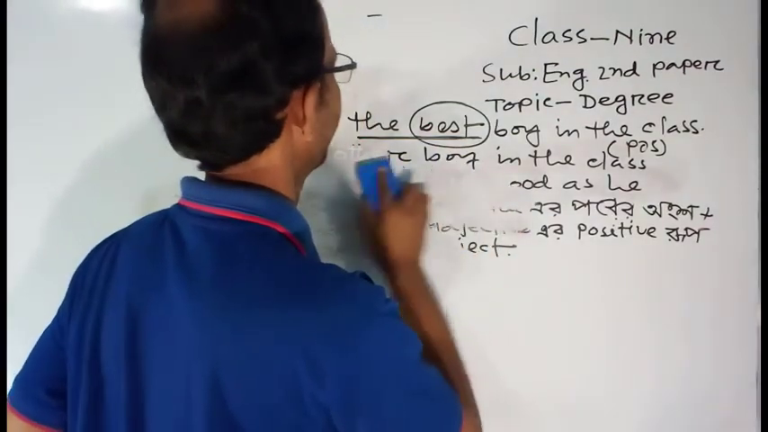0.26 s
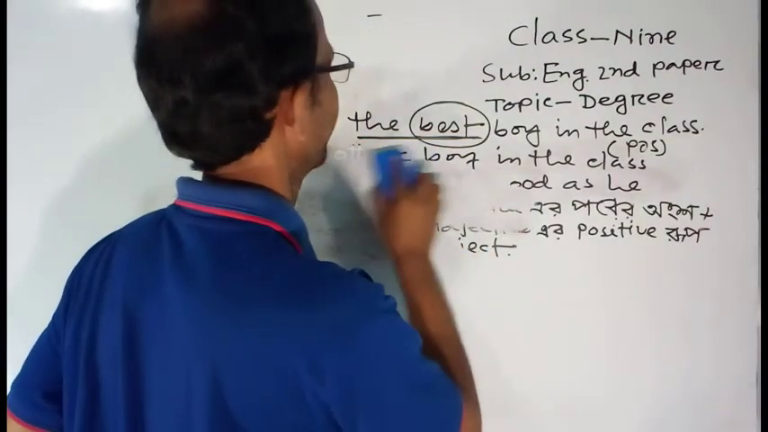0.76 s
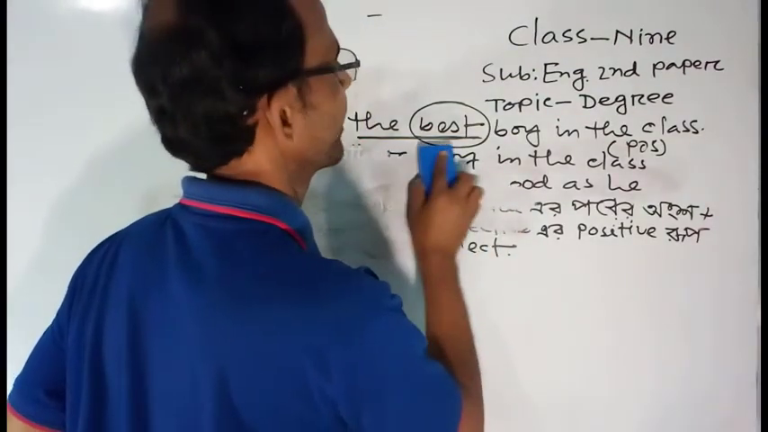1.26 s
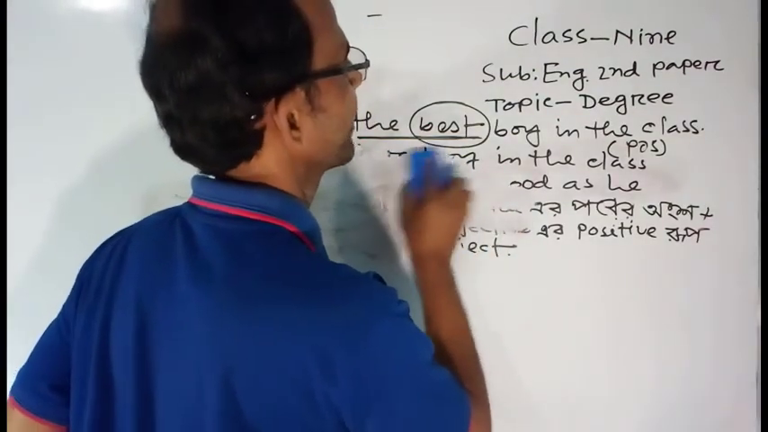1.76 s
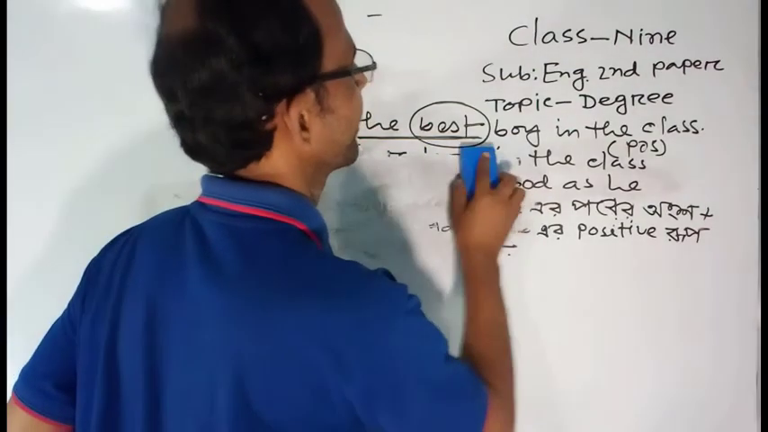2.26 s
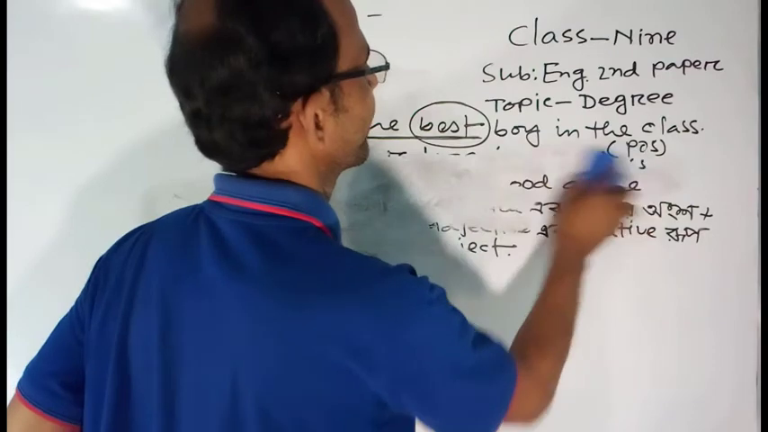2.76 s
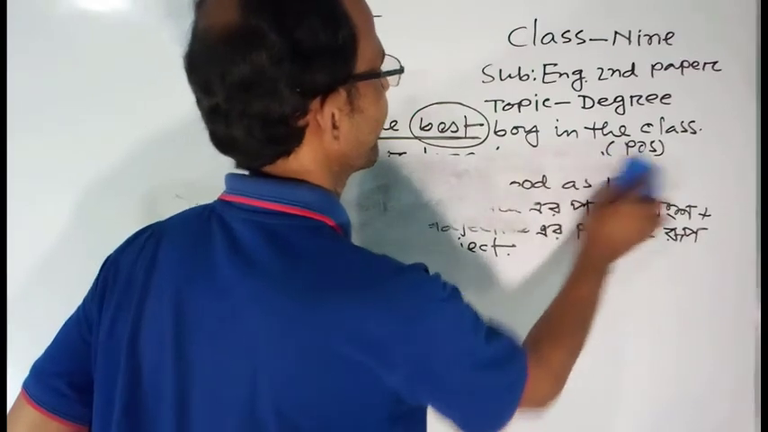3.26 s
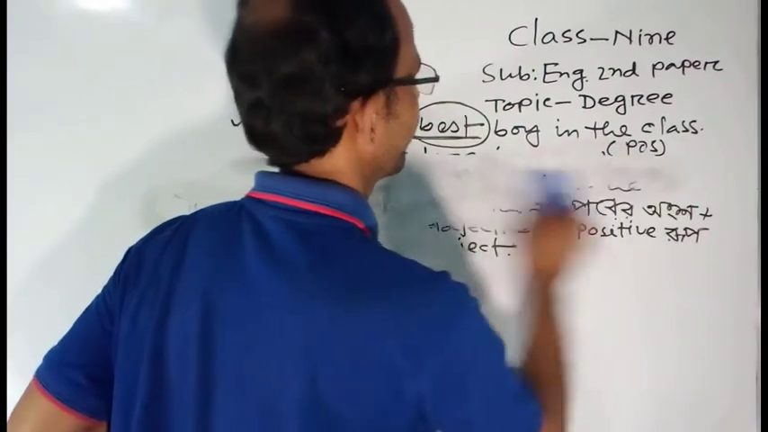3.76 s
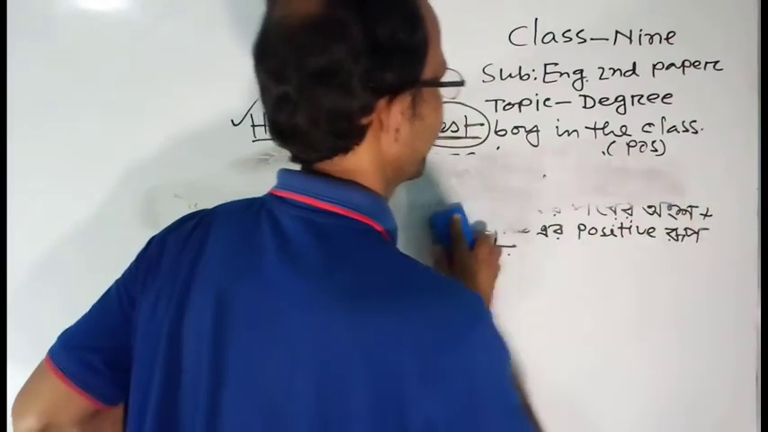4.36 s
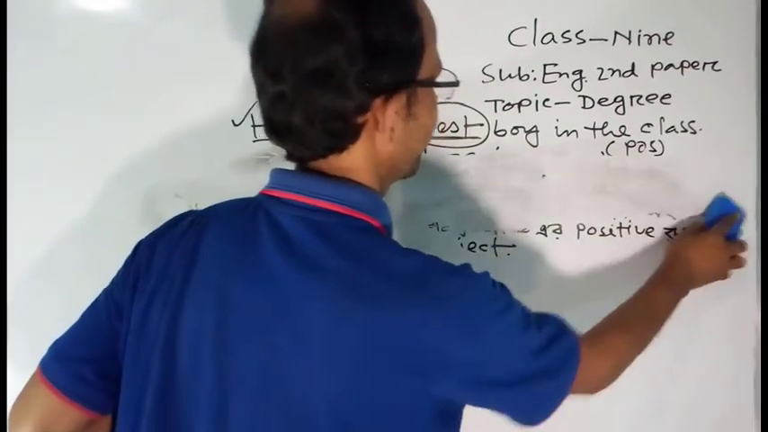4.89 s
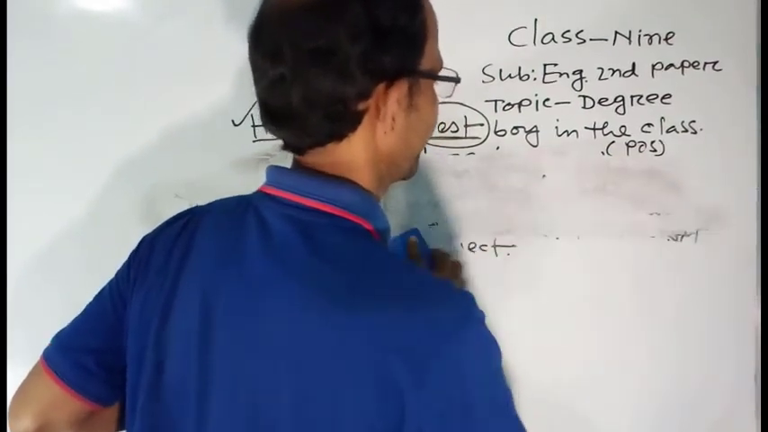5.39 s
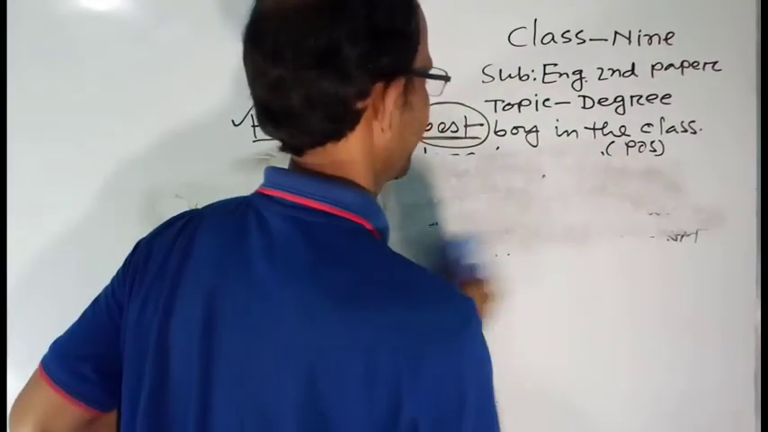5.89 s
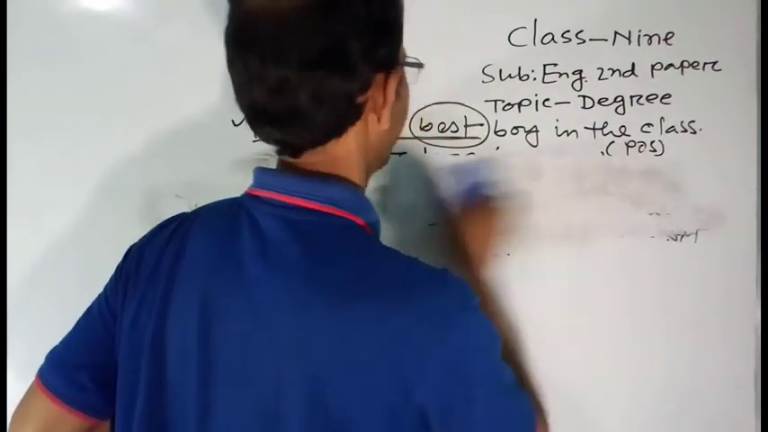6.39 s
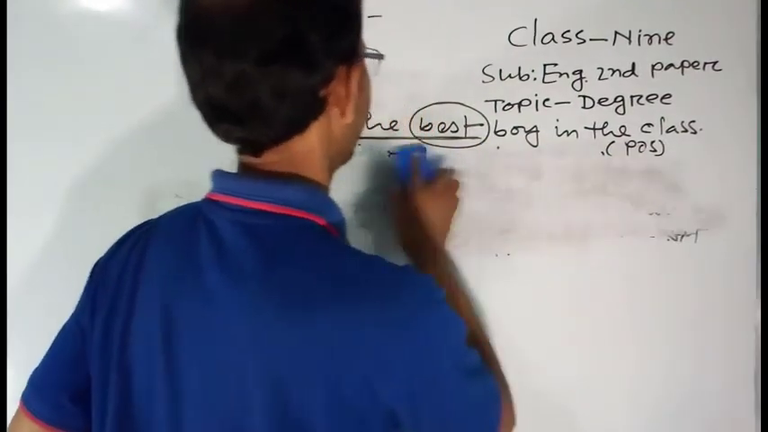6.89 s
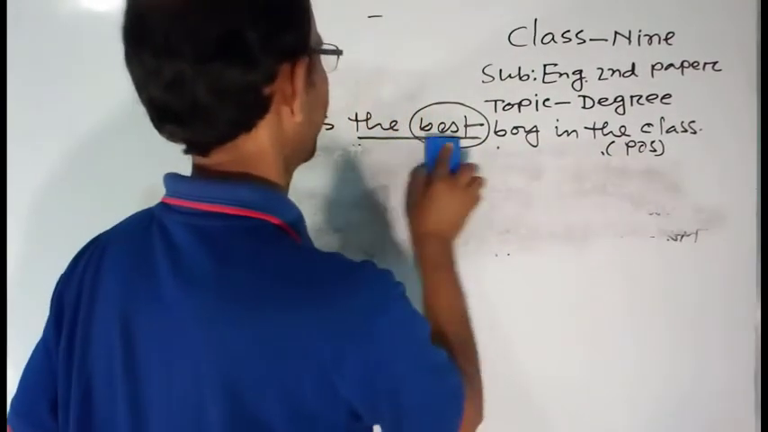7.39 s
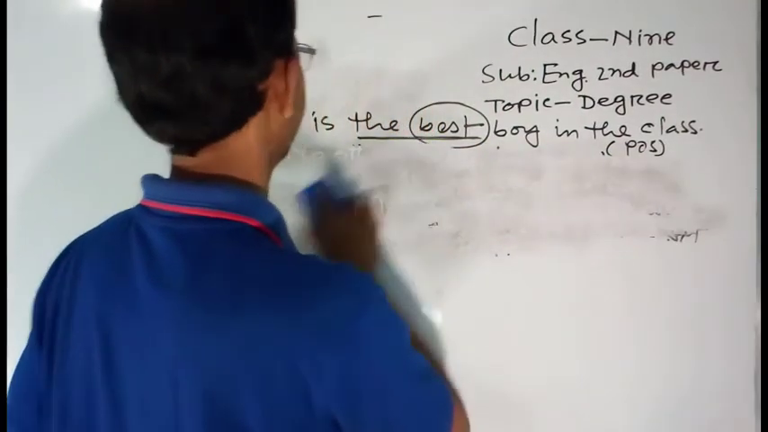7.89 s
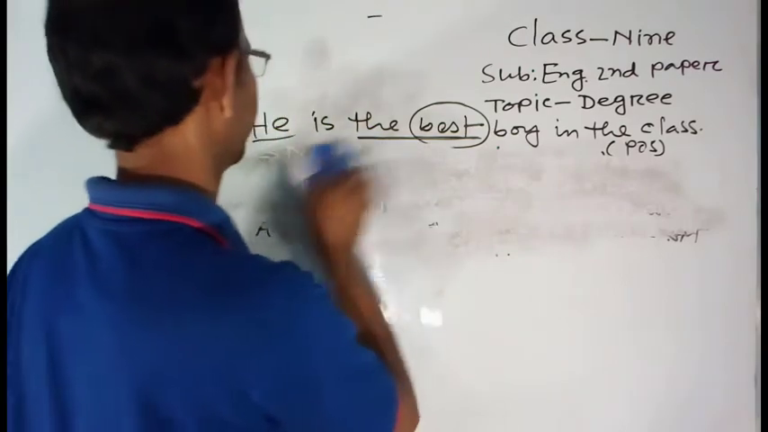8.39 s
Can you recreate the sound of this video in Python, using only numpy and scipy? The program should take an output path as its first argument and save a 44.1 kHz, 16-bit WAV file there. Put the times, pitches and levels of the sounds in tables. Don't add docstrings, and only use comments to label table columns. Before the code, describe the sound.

Brisk, raspy swishes of felt rubbing a smooth board, short then longer then short again, with occasional knocks and faint squeaky tones.

```python
import sys
import numpy as np
from scipy import signal
from scipy.fft import rfft, irfft, next_fast_len
from scipy.io import wavfile
from scipy.ndimage import map_coordinates

SR = 44100
rng = np.random.default_rng(int(sys.argv[2]) if len(sys.argv) > 2 else 0)


def convert_level_to_amplitude(level_db):
    exponent = np.asarray(level_db, float) / 20
    return 10 ** exponent


def store_pcm(level_fs):
    pcm = np.round(np.clip(level_fs, -1, 1) * 32767).astype(np.int16)
    wavfile.write(sys.argv[1], SR, np.atleast_2d(pcm).T)


N = 381465

# [f/Hz, density/dB per Hz]
FAN_HISS = [(30, -104), (48, -76.5), (150, -78.5), (350, -85.5), (900, -92.5), (2000, -93), (4000, -91.5),
            (5900, -96), (6500, -82), (7000, -81), (7500, -101), (10500, -100), (12500, -113),
            (16000, -117)]
# [f/Hz, width/Hz, density/dB per Hz]
FAN_WHINE = [(636, 29, -85), (673, 5.3, -103), (2526, 162, -81)]

# [f/Hz, density/dB per Hz]
THUD_SPECTRUM = [(28, -28), (45, -3), (65, -8), (110, -6), (180, -8.5), (260, -20)]
# [f/Hz, width/Hz, level/dB]
GROAN_MODES = [(300, 8, 12), (376, 18.5, 4), (186, 31, -32)]
# [t/s, level/dB, hold/s]
THUD_PUSHES = [(.11, -49, 0.033), (.23, -51.5, 0.0076), (.87, -54, 0.012), (1.6, -49.5, 0.011),
               (1.92, -46.5, 0.04), (2.19, -48.5, 0.013), (2.53, -47.5, 0.027), (2.93, -48.5, 0.012),
               (3.01, -48, 0.014), (3.27, -50.5, 0.04), (3.54, -46.5, 0.05), (3.85, -47, 0.086),
               (4.19, -48, 0.043), (4.8, -48, 0.011), (5.3, -57.5, 0.026), (5.62, -51, 0.2),
               (5.8, -45, 0.024), (6.23, -51.5, 0.068), (6.57, -55, 0.025), (6.75, -65, .02),
               (6.9, -58, 0.048), (7.09, -64, 0.011), (7.7, -55, .03), (8.25, -48.5, 0.065)]
# [t/s, level/dB, hold/s]
GROAN_PUSHES = [(.22, -70, .02), (.98, -62.5, 0.0042), (1.63, -64, 0.044), (1.92, -71, .02),
                (2.93, -62.5, 0.03), (3.42, -58.5, 0.014), (3.89, -54, 0.032), (5.295, -55.5, 0.0043),
                (6.23, -65.5, .04), (6.57, -63, .02), (6.64, -65, 0.011), (6.96, -56, 0.11)]
THUD_FADE_DB_PER_S, GROAN_FADE_DB_PER_S = 424, 406
THUD_DB, PANEL_REST_DB = -4, -73.5

# [t/s, peak level/dB, bright part/dB]
EDGE_TAPS = [
    (2.984, -27, -10),
    (2.993, -21.5, -16.5),
    (3.243, -54, 7),
    (4.887, -37, -27.5),
    (4.8909, -25.5, -13),
    (4.896, -25.5, -16),
    (5.283, -23, -31),
    (5.3437, -42, 2),
]
# [f/Hz, width/Hz, level/dB]
EDGE_DULL = [(1370, 390, -16), (2330, 1200, -12.5), (2950, 90, 1)]
# [f/Hz, width/Hz, level/dB]
EDGE_BRIGHT_MODES = [(7540, 67, -9.5), (9800, 1200, -0.5)]

# [centre t/s, length/s, f/Hz, width/Hz,
# level/dB]
FELT_GRIPS = [(0.586, 0.034, 10950, 150, -70.5), (1.206, 0.025, 2067, 120, -56.5),
              (1.587, 0.028, 2090, 121, -53), (2.0, 0.059, 1580, 153, -62.5), (2.522, 0.034, 636, 110, -59),
              (2.774, 0.19, 2600, 87.7, -76), (3.002, 0.04, 70, 60, -64), (3.145, 0.13, 2560, 88, -56.5),
              (3.329, 0.072, 2360, 89, -72), (3.55, 0.097, 1202, 119, -60.5),
              (4.055, 0.065, 2620, 90.5, -57.5), (4.48, 0.025, 824, 110, -61),
              (5.303, 0.059, 698, 152.5, -59.5), (5.621, 0.077, 1775, 300, -54.5),
              (6.283, 0.05, 1200, 142, -63.5), (6.561, 0.045, 425, 70, -60),
              (6.869, 0.067, 300, 39.3, -56.5), (7.001, 0.02, 300, 40, -61), (7.498, 0.16, 2593, 123, -58),
              (7.161, 0.11, 1677, 120, -66), (7.953, 0.049, 1114, 151, -60.5),
              (7.98, 0.044, 1650, 119, -59), (8.573, 0.05, 1240, 204, -64),
              (8.579, 0.06, 5550, 512.5, -58.5)]

# [f/Hz, density/dB per Hz]
FELT_FRICTION = [(320, -71), (600, -29), (1000, -14.5), (1190, -12.5), (2150, -3), (2400, -2), (2880, -3),
                 (3500, -4.5), (4320, -0.5), (5850, -2), (6400, -6),
                 (7200, -5.5), (8200, -10.5), (10400, -1.5), (11800, -10.5), (13000, -21.5), (13900, -28.5),
             (14300, -4.5), (15300, -4.5), (15700, -21.5)]
# [f/Hz, width/Hz, level/dB]
BOARD_MODES = [(1200, 123, 2), (1644, 84, -4.5), (2090, 20, -4), (2560, 14.7, 5.5), (3643, 80, -7),
               (4660, 98, -10.5), (11210, 66, -2)]
# [start t/s, length/s, scrub level/dB, swell/dB, drone re
# scrub/dB]
ERASER_STROKES = [(-0.123, 0.25, -48, -14, -10), (0.079, 0.24, -56.5, -3, -9.5),
                  (0.29, 0.2, -50, -1.5, -12), (0.677, 0.22, -50, 6, -13), (1.071, 0.19, -50, 6, -13.5),
                  (1.452, 0.2, -50, 3, -17), (1.825, 0.27, -47, 5, -12), (2.255, 0.42, -44.5, 1, -11),
                  (2.713, 0.18, -52.5, 9, -35), (2.882, 0.28, -44.5, -7.5, -17),
                  (3.229, .389, -48.5, 21.5, -13.5), (3.584, 0.41, -43, 8, -11.5),
               (3.978, 0.44, -46.5, 13.5, -13), (4.373, 0.54, -43, -2, -12), (4.914, 0.49, -44, 12, -12),
               (5.432, .32, -43.5, 8, -12.5), (5.726, .28, -48, -1.5, -10), (5.99, 0.35, -46.5, -5.5, -14),
               (6.26, 0.28, -47.5, -1, -12.5), (6.496, .22, -46, -9.5, -12.5),
               (6.694, 0.2, -47.5, 11.5, -12.5),
                  (7.081, 0.15, -52.5, 8, -5), (7.233, 0.19, -45, 6.5, -11.5),
                  (7.418, 0.18, -51.5, 3.5, -9), (7.566, 0.12, -52, 2, -9), (7.701, 0.19, -49, 13.5, -11),
                  (7.875, 0.212, -46.5, -10, -14.5), (8.043, 0.13, -52, 4, -11),
                  (8.182, 0.14, -51, -0.1, -10), (8.314, 0.27, -52, 4.5, -6.5),
                  (8.518, 0.19, -57.5, -19, -6)]
# [start t/s, length/s, scrub level/dB]
LIGHT_RETURNS = [(.5, 0.17, -64.5), (0.902, .13, -71), (1.266, .15, -68.5), (1.653, 0.13, -69),
                 (2.116, 0.11, -62), (6.937, 0.11, -69)]
RETURN_DRONE_DB = -41
# [t/s, brightness/dB]
FELT_TILT = [(0, -1.5), (.8, -7.5), (1.6, 0), (2, 1.5), (2.6, 0.5), (3, 2.5), (3.4, -4), (3.8, 1), (4.6, 3),
             (5.6, -6), (6.1, -5.5), (6.6, 5), (6.85, -16), (7.33, -1), (7.5, -9), (7.82, 5), (8.15, -10),
             (8.65, 9)]
# [t/s, level/dB, hold/s]
HAND_DIGS = [(.0, -62, 0.029), (1.97, -59.5, 0.03), (2.995, -51, 0.021), (3.83, -53, 0.022),
             (4.26, -51.5, 0.087), (4.57, -47, 0.033), (5.29, -42.5, 0.045), (5.62, -54, 0.038),
             (6.44, -55.5, 0.021), (7.98, -58.5, 0.037)]
DIG_FADE_DB_PER_S = 209

REGION_HZ = [0, 2400, 6700, 13900, 22000]
# [level/dB, power of hand speed, extra swell/dB, lead/s]
REGION_VOICES = [(-0.5, 0.9, 7.5, 0.0079), (-2, 1.113, 1, .001), (-9, 1.58, 2.5, 0.013),
                 (-20.5, 2.8, 2, 0.011)]
REGION_FOLLOWS = [(.01, 0.81, 0.74), (.01, .6, 0.68), (.2, .1, 0.56), (.95, .03, .7)]
REGION_RAMPS_S = [.35, 0.34, 0.22, 0.23]
REGION_LINGER_DB = [-18.5, -12.5, -42, -44]
REGION_FLUTTER_DB = [1.78, 1.14, 1.57, 2.7]
LINGER_S, FLUTTER_PER_S = 0.05, 14


def unit(x):
    return x / np.sqrt(np.mean(x ** 2) + 1e-20)


def along(points, hz):
    f, v = np.transpose(points)
    return np.interp(np.log(hz + 1), np.log(f + 1), v)


def curves(rows):
    s, *cols = np.transpose(rows)
    return [np.interp(np.arange(N) / SR, s, c) for c in cols]


def filtered(x, response):
    m = next_fast_len(N + 8192)
    return irfft(rfft(x, m) * response(np.fft.rfftfreq(m, 1 / SR)), m)[:N]


def modes(table):
    def response(f):
        total = 0
        for k, (centre, width, db) in enumerate(table):
            damping = 1j * f * width
            total = total + (-1) ** k * convert_level_to_amplitude(db) * damping / (centre * centre - f * f + damping)
        return total
    return response


def blur(field, steps, axis):
    kernel = np.exp(-abs(np.arange(-60, 61)) / max(steps, 0.1))
    kernel = np.expand_dims(kernel, 1 - axis)

    def smooth(v):
        return signal.fftconvolve(v, kernel, "same", axes=axis)
    return smooth(field) / smooth(np.ones_like(field))


def pushes(rows, fade_db_per_s):
    t = np.arange(0, N / SR + 0.002, 0.001)
    level = 0
    for s, db, hold_s in rows:
        outside_s = np.maximum(abs(t - s) - abs(hold_s) / 2, 0)
        level = level + convert_level_to_amplitude(db - fade_db_per_s * outside_s)
    return np.interp(np.arange(N) / SR, t, level)


def fan():
    def response(hz):
        whine = sum(convert_level_to_amplitude(db) * abs(modes([(c, w, 0)])(hz)) ** 2 for c, w, db in FAN_WHINE)
        return (convert_level_to_amplitude(along(FAN_HISS, hz)) + whine) * np.sqrt(SR / 2)
    return filtered(rng.standard_normal(N), response)


def panel():
    spectrum = THUD_SPECTRUM + [(400, -120)]
    thud = unit(filtered(rng.standard_normal(N), lambda hz: convert_level_to_amplitude(along(spectrum, hz))))
    groan = filtered(rng.standard_normal(N), lambda hz: modes(GROAN_MODES)(hz) / (1 + (hz / 480) ** 8))
    thud_level = convert_level_to_amplitude(THUD_DB) * pushes(THUD_PUSHES, THUD_FADE_DB_PER_S) + convert_level_to_amplitude(PANEL_REST_DB)
    groan_level = pushes(GROAN_PUSHES, GROAN_FADE_DB_PER_S) + convert_level_to_amplitude(PANEL_REST_DB)
    return thud_level * thud + groan_level * unit(groan)


def taps():
    dull, bright = np.zeros(N + 400), np.zeros(N + 400)
    t = np.arange(200) / SR
    envelope = np.exp(-(t / 0.0011 - 1.1) ** 2)
    for s, db, bright_db in EDGE_TAPS:
        scratch = convert_level_to_amplitude(db + 12) * rng.standard_normal((2, len(t))) * envelope
        start = round(s * SR)
        dull[start:][:len(t)] += scratch[0]
        bright[start:][:len(t)] += convert_level_to_amplitude(bright_db) * scratch[1]
    dull = filtered(dull[:N], lambda hz: modes(EDGE_DULL)(hz) / (1 + 1j * hz / 3500) ** 2)
    bright = filtered(bright[:N], lambda hz: modes(EDGE_BRIGHT_MODES)(hz) / (1 + (hz / 11800) ** 12))
    return dull + bright


def grips():
    sound = np.zeros(N + SR)
    t = np.arange(-SR // 4, SR // 4) / SR
    f = np.fft.rfftfreq(len(t), 1 / SR)
    for s, length_s, hz, width_hz, db in FELT_GRIPS:
        noise = rfft(rng.standard_normal(len(t)))
        sung = irfft(noise * modes([(hz, width_hz, 0)])(f) ** 2, len(t))
        sound[round(s * SR):][:len(t)] += convert_level_to_amplitude(db) * unit(sung) * np.exp(-(t / length_s) ** 2)
    return sound[SR // 4:][:N]


def fibres(grit_db, patchy_db, patch_bins, patch_frames):
    grit = blur(rng.standard_normal((N, 1)), 4.1, axis=0)[:, 0]
    catches = rng.standard_normal(N) * convert_level_to_amplitude(grit_db * unit(grit))
    z = signal.stft(catches, nperseg=512, noverlap=384)[2]
    field = blur(rng.standard_normal(z.shape), patch_bins, axis=0)
    field = blur(field, patch_frames, axis=1)
    return signal.istft(z * convert_level_to_amplitude(patchy_db * unit(field)), nperseg=512, noverlap=384)[1][:N]


def strokes(level_db, power, swell_db, lead_s, lean_share, drone_share, ramp_s):
    t, energy = np.arange(N) / SR + lead_s, np.zeros(N)
    rows = ERASER_STROKES
    rows = rows + [(*row, 0, RETURN_DRONE_DB) for row in LIGHT_RETURNS]
    for s, length_s, db, lean_db, drone_db in rows:
        inside = slice(*np.searchsorted(t, [s, s + length_s]))
        way = (t[inside] - s) / length_s
        steadiness = length_s / ramp_s
        speed = np.tanh(abs(np.sin(np.pi * way)) * steadiness) / np.tanh(steadiness)
        slope_db = (lean_share * lean_db + swell_db) * (way - 0.5)
        stroke_db = db + level_db + drone_share * drone_db + slope_db
        energy[inside] += (speed ** power * convert_level_to_amplitude(stroke_db)) ** 2
    return np.sqrt(energy)


def uneven(level, linger_db, flutter_db):
    keep = np.exp(-1 / (LINGER_S * SR))
    tail = signal.lfilter([1 - keep], [1, -keep], level ** 2)
    flutter = map_coordinates(rng.standard_normal(400), [np.arange(N) * FLUTTER_PER_S / SR])
    return np.sqrt(level ** 2 + convert_level_to_amplitude(linger_db) ** 2 * tail) * convert_level_to_amplitude(flutter_db * flutter)


def eraser():
    bright_db, = curves(FELT_TILT)
    dig = pushes(HAND_DIGS, DIG_FADE_DB_PER_S)
    rub = fibres(grit_db=0.5, patchy_db=3.0, patch_bins=0.43, patch_frames=11.6)
    whisper_db = [-74, -62.5, -71, -96.5]

    def colour(hz):
        ringing = sum(abs(modes([mode])(hz)) for mode in BOARD_MODES)
        return convert_level_to_amplitude(along(FELT_FRICTION, hz)) * (1 + ringing)

    sound = 0
    for k, (lo, hi) in enumerate(zip(REGION_HZ, REGION_HZ[1:])):
        bright, dug, lean = REGION_FOLLOWS[k]
        region = filtered(rub, lambda hz: colour(hz) * (hz >= lo) * (hz < hi))
        stroke = strokes(*REGION_VOICES[k], lean, lo == 0, REGION_RAMPS_S[k])
        level = np.hypot(stroke, dug * dig) * convert_level_to_amplitude(bright * bright_db)
        level = uneven(level, REGION_LINGER_DB[k], REGION_FLUTTER_DB[k])
        sound = sound + (level + convert_level_to_amplitude(whisper_db[k])) * unit(region)
    return sound


def scene():
    sound = fan() + panel() + taps() + grips() + eraser()
    return np.array([sound, sound])


def suppressor(x, margin_db, soft_db, depth_db, listen, bins, frames):
    hiss = signal.stft(fan(), nperseg=1024, noverlap=768)[2]
    learnt = np.mean(abs(hiss) ** 2, axis=1, keepdims=True)
    threshold = np.maximum(learnt, blur(learnt, 0.68, axis=0))
    z = signal.stft(x, nperseg=1024, noverlap=768)[2]
    power = abs(blur(blur(abs(z) ** 2, 0.83, axis=0), listen, axis=1))
    over_db = 10 * np.log10(power / threshold + 1e-9) - margin_db
    shut = 0.5 - 0.5 * np.tanh(over_db / soft_db)
    cut_db = depth_db * blur(blur(shut, bins, axis=0), frames, axis=1)
    return signal.istft(z * convert_level_to_amplitude(cut_db), nperseg=1024, noverlap=768)[1][:N]


def roll_off(x):
    return signal.sosfilt(signal.butter(12, 17000, fs=SR, output="sos"), x)


def record(dry):
    clean = suppressor(dry[0], margin_db=4.0, soft_db=3.0, depth_db=-31, listen=2.7, bins=0.67, frames=1.72)
    clean = filtered(clean, lambda hz: hz < 15700)
    return roll_off(np.array([clean, clean]))


dry = scene()
out = record(dry)
store_pcm(out)
```